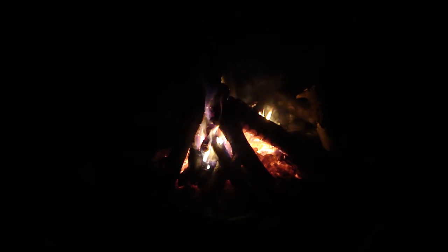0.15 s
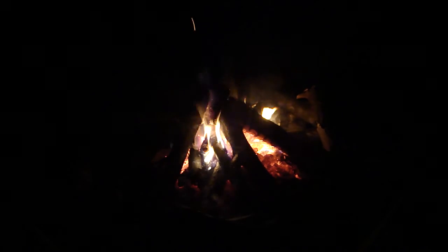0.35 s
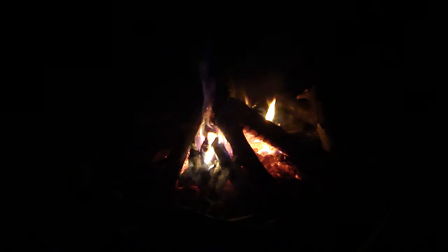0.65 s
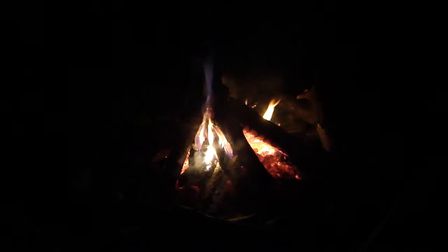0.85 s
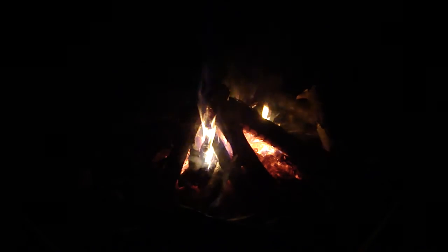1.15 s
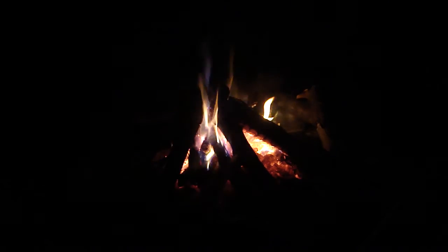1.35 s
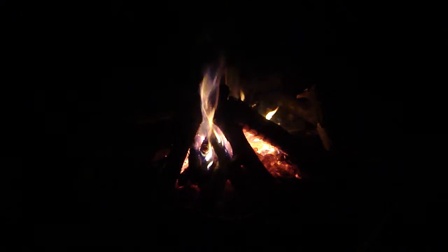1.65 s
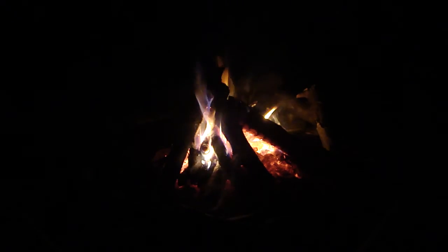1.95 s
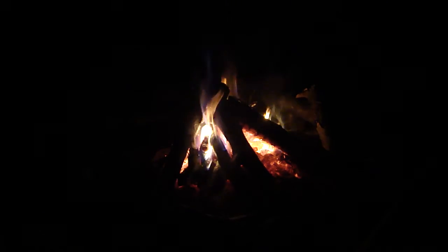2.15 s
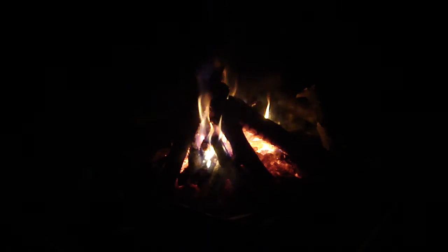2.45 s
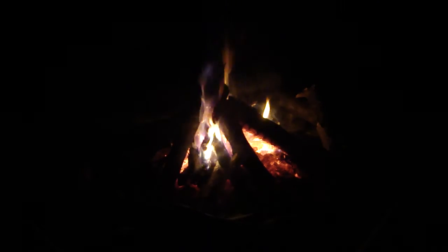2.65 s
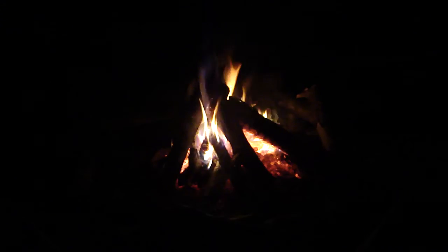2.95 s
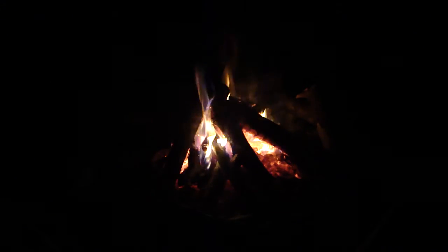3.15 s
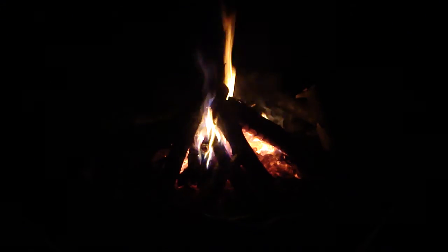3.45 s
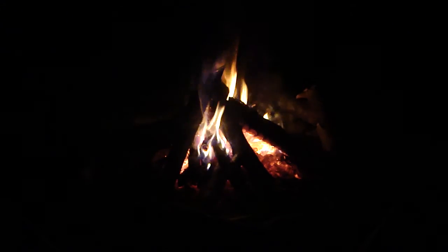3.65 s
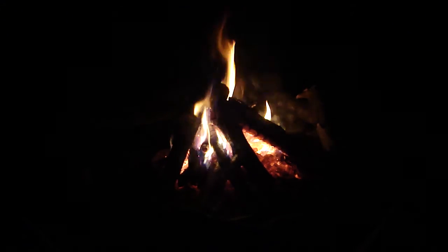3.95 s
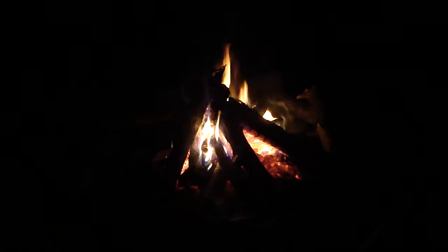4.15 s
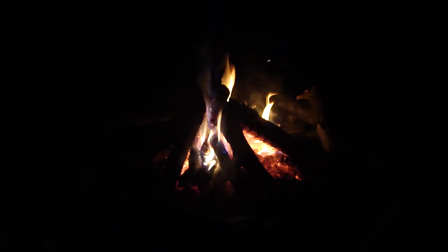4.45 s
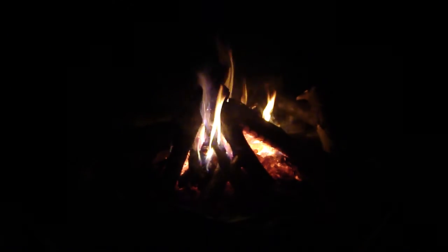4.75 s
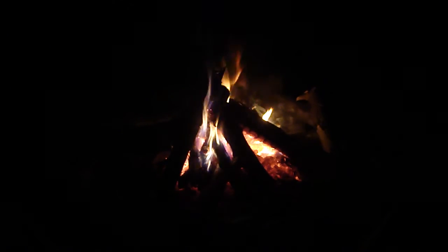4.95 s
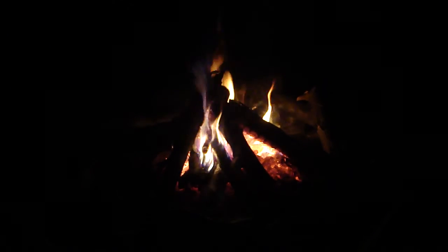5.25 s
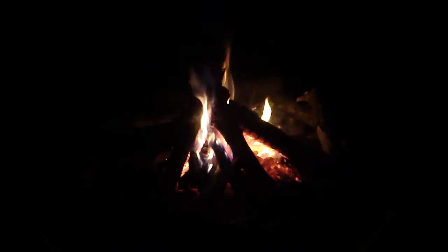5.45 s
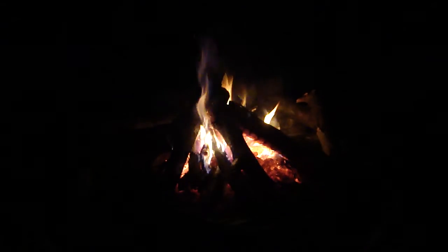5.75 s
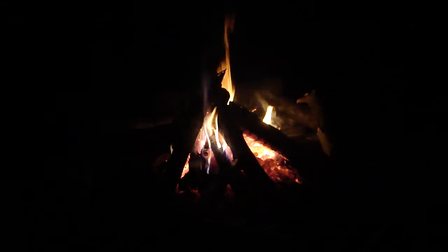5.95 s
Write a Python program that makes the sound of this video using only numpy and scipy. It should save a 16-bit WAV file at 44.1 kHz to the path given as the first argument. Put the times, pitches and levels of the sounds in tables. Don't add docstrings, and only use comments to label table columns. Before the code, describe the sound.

A small campfire at night, heard from a couple of metres. Soft flame roar and thin steady hiss run throughout, with a very faint cricket trill far off. Sharp woody cracks come irregularly, the hardest in the first second and near 2.8 seconds, with fine ticks between. Each pop sprays a brief splintery crackle and gets a quick echo from nearby trees. One microphone, mono.

```python
import sys
import numpy as np
from scipy import signal
from scipy.fft import rfft, irfft, next_fast_len
from scipy.io import wavfile
from scipy.ndimage import uniform_filter1d, map_coordinates

SR = 44100
rng = np.random.default_rng(int(sys.argv[2]) if len(sys.argv) > 2 else 0)


def voltage_ratio(decibels):
    exponent = np.asarray(decibels, float) / 20
    return 10 ** exponent


def to_wav(s):
    ch = np.atleast_2d(s).T
    pcm = np.round(np.clip(ch, -1, 1) * 32767)
    wavfile.write(sys.argv[1], SR, pcm.astype(np.int16))


N = 268524

# freq_hz, level_db (per Hz)
ROAR_COLOUR = [(20, -36.5), (85, -24.5), (112, -16.5), (182, -12.5), (300, -10), (543, -12), (700, -10),
               (1000, -11), (1500, -16.5), (2250, -20.5), (4000, -28.5), (8000, -40)]
# freq_hz, level_db (per Hz)
HISS_COLOUR = [(500, -35), (1500, -15.5), (2800, 3), (4500, 0), (6000, -4.5), (7300, -1), (8500, -3),
               (10900, -3.5), (14000, -12)]
# centre_hz, width_hz
HOLLOW = (342, 87)
# time_s, level_db
DRAUGHT = [(0, -62), (.6, -65.5), (1.9, -60), (3.1, -59.5), (3.34, -52.5), (3.6, -59), (3.9, -55),
           (4.6, -54), (5.1, -54), (6.09, -54)]
# start_s, peak_db, pitch_hz
TICKS = [(0.0494, -54, 3680), (1.5994, -37, 1010), (2.0238, -54, 3390), (2.0946, -47, 3010),
         (2.6792, -34, 7630), (3.023, -41, 4630), (3.3258, -48, 3150), (3.5063, -42, 4540),
         (3.526, -40, 3430), (4.0562, -40, 3210), (4.2333, -41, 4500), (4.6994, -50, 4220),
         (5.8194, -40, 3640), (5.895, -43, 3360)]
BURSTS = {"leaning": [(0.6288, -13.9, 1640, 5.5, -7), (0.7325, -21, 1490, 4, -27),
          (2.1354, -25.5, 3350, 16.5, -13), (2.4888, -45, 3500, 3, -31), (3.9049, -37.5, 1390, -1, -45),
          (3.9295, -27.5, 2980, -4, -21.5)], "front": [(0.1749, -16, 2650, -4, -19),
          (0.9756, -32, 2600, 1.5, -19), (3.6122, -27, 6300, -7.5, -27), (4.0839, -30.5, 6380, -14, -30),
          (4.3566, -25.5, 2950, -12, -24), (5.1339, -32.5, 2120, -3.5, -24)],
          "back": [(0.4848, -46, 3330, -4, -42), (2.2901, -40.3, 900, -9, -33),
          (2.7795, -12, 2170, -22, -10.5), (3.0052, -32.5, 1070, -9, -38), (4.615, -34.5, 6100, -13.2, -48),
          (6.0638, -40, 1700, -4.5, -32)], "side": [(1.1952, -27.5, 920, 9.5, -19),
          (1.3342, -49, 910, 9, -31), (5.2251, -42.5, 915, 9.5, -28), (5.5847, -38, 1300, 11.5, -22)],
          "top": [(2.5953, -47, 2500, -7, -27.5), (5.6959, -23.5, 1430, 5, -14.5)]}
SECOND_JUMP_LAG_MS = {"leaning": .87, "front": .23, "back": 1.32, "side": .84, "top": .76}
LOGS = {"leaning": (3, 8500, 9000, 0), "front": (0.54, 7600, 11000, 1), "back": (0.96, 3600, 9000, 1),
        "side": (4.4, 9900, 4700, 3.3), "top": (4, 4500, 9000, -2.5)}
LOG_MODES = {"leaning": [(1515, -14.5, 0.012), (2460, -31, 0.015), (4500, -14, 0.0058),
             (7600, -15.5, 0.0027), (9270, -12, 0.0025), (10340, -16, 0.0034)], "front": [(586, -14, 0.019),
             (1300, -8.5, 0.0043), (2790, -25, 0.025), (3350, -7.5, 0.005), (4850, -13, 0.0072),
             (9670, -9, 0.0035)], "back": [(670, -17.5, 0.034), (1390, -13.5, .012), (2950, -12.5, 0.015),
             (4400, -23, .008), (7300, -15, .005)], "side": [(725, -5.5, 0.0097), (1640, -13.5, 0.026),
             (3360, -11.5, 0.0092), (4680, -18, 0.0091)], "top": [(705, -16.5, 0.028), (1490, -5, 0.017),
             (2646, -5, 0.0083), (4500, -11.5, 0.01)]}
# freq_hz, t60_s
TREE_DECAY = [(400, 0.059), (2000, 0.22), (6000, 0.14), (11000, 0.14)]
# freq_hz, level_db
LEAF_COLOUR = [(300, -14), (1000, -15), (3000, 1.5), (7000, 10.5), (11000, 6)]
# freq_hz, width_hz, share (0 to 1)
GROUND_DIPS = [(1950, 150, 0.33), (3670, 220, 0.62)]
# down_s, up_s, depth_db, click_db
GAIN_STEPS = [
    (.6295, .6857, -3, -34),
    (2.1362, 2.1705, -6, -33),
]
# freq_hz, level_db
BAND_LIMIT = [(11000, 0), (11090, -29), (12900, -59), (12990, -17), (13150, -19), (13500, -36),
              (13900, -50), (14500, -90)]

ROAR_DB, HISS_DB, CRICKET_DB = -53.5, -60.5, -66.5
SPLINTER_T60_S, SPLINTER_DRIVE_DB = 0.005, -8.5
ECHO_DB_PER_OCTAVE = -0.5


def unit(x):
    return x / np.sqrt(np.mean(x ** 2) + 1e-20)


def along(points, hz):
    f, v = np.transpose(points)
    return np.interp(np.log(hz + 1), np.log(f + 1), v)


def wobble(rate_hz):
    knots = rng.standard_normal(int(N * rate_hz / SR) + 4)
    return map_coordinates(knots, [np.arange(N) * rate_hz / SR])


def filtered(x, response):
    n = x.shape[-1]
    m = next_fast_len(n + 4096)
    return irfft(rfft(x, m) * response(np.fft.rfftfreq(m, 1 / SR)), m)[..., :n]


def resonance(hz, width_hz):
    return lambda f: 1j * f * width_hz / (hz * hz - f * f + 1j * f * width_hz)


def rush(response, patchy_db):
    z = signal.stft(rng.standard_normal(N), nperseg=512)[2]
    patches = uniform_filter1d(rng.standard_normal(z.shape), size=6, axis=0)
    patches = uniform_filter1d(patches, size=10, axis=1)
    noise = signal.istft(z * voltage_ratio(patchy_db * unit(patches)), nperseg=512)[1][:N]
    return unit(filtered(noise, response))


def flames():
    flicker = wobble(11)

    roar_db = ROAR_DB + 0.51 * flicker + 0.35 * wobble(40)
    roar = voltage_ratio(roar_db) * rush(lambda f: voltage_ratio(along(ROAR_COLOUR, f)), patchy_db=0.62)

    draught_s, draught_db = np.transpose(DRAUGHT)
    hollow_db = np.interp(np.arange(N) / SR, draught_s, draught_db) - 2 + flicker + 1.2 * wobble(25)
    hollow = voltage_ratio(hollow_db) * rush(lambda f: resonance(*HOLLOW)(f) ** 2, patchy_db=1.0)

    hiss_db = HISS_DB + 0.32 * flicker
    hiss = voltage_ratio(hiss_db) * rush(lambda f: voltage_ratio(along(HISS_COLOUR, f)), patchy_db=0.5)
    return roar + hollow + hiss


def cricket():
    level_db = CRICKET_DB + 0.7 * wobble(1.5)
    stroke_phase = 2 * np.pi * np.cumsum(33.0 * (1 + 0.012 * wobble(3.43))) / SR
    swell = 0.8 + np.clip(np.sin(stroke_phase), 0, 1)
    pitch_hz = 2420 + 40 * np.cos(stroke_phase) + 30 * wobble(60)
    tone = np.sin(2 * np.pi * np.cumsum(pitch_hz) / SR)
    blur = rush(lambda f: resonance(2430, 190)(f) ** 2, patchy_db=0.0)
    return voltage_ratio(level_db) * unit(swell * (tone + 0.65 * blur))


def ticks(count=120):
    draw = rng.random((count, 3))
    faint_s = draw[:, 0] * N / SR
    faint_db = -56 - 3.5 * np.log(draw[:, 1] + .03)
    faint_hz = 3500 * voltage_ratio(16 * (draw[:, 2] - .5))
    out, t = np.zeros(N + SR), np.arange(300) / SR
    for start_s, peak_db, hz in np.r_[TICKS, np.c_[faint_s, faint_db, faint_hz]]:
        snap = voltage_ratio(peak_db - 60 * t * hz / 9) * np.sin(2 * np.pi * hz * t)
        out[round(start_s * SR):][:len(t)] -= snap
    return out[:N]


def jump(t, hz):
    u = 2 * np.pi * hz * t
    u = np.where(u > 0, u / 1.306, u)
    return u * np.exp(.5 - u * u / 2)


def reach(f, hz):
    return f / hz * np.exp(.5 - (f / hz) ** 2 / 2)


def trees():
    hz, frame_s, z = signal.stft(rng.standard_normal(SR // 5), SR, nperseg=256)
    decay_db = -60 * frame_s / along(TREE_DECAY, hz)[:, None]
    tail = signal.istft(z * voltage_ratio(along(LEAF_COLOUR, hz)[:, None] + decay_db), SR, nperseg=256)[1]
    t = np.arange(len(tail)) / SR
    leaves = np.clip((t - .011) / 0.011, 0, 1) * tail
    trunk = (t > .0238) * voltage_ratio(-60 * np.abs(t - .0238) / 0.0049) * rng.standard_normal(len(t))
    ground = voltage_ratio(-60 * t / 0.03) * rng.standard_normal(len(t))
    layers = ((leaves, -15), (trunk, -22), (ground, -9.5))
    return sum(voltage_ratio(db) * x / np.linalg.norm(x) for x, db in layers)


def pops():
    out, lead = np.zeros(N + SR), 64
    t = (np.arange(1400) - lead) / SR
    after = np.maximum(t, 0)
    for name, bursts in BURSTS.items():
        ratio, spray_hz, width_hz, log_echo_db = LOGS[name]
        second_t = t - SECOND_JUMP_LAG_MS[name] / 1000
        spray = lambda f: resonance(spray_hz, width_hz)(f) ** 2
        for start_s, peak_db, hz, second_db, spray_db in bursts:
            jumps = voltage_ratio(peak_db) * (jump(t, hz) + voltage_ratio(second_db) * jump(second_t, ratio * hz))

            ring = np.zeros(len(t))
            for mode_hz, mode_db, t60_s in LOG_MODES[name]:
                drive = voltage_ratio(peak_db) * (reach(mode_hz, hz) + voltage_ratio(second_db) * reach(mode_hz, ratio * hz))
                drive += voltage_ratio(spray_db + SPLINTER_DRIVE_DB) * abs(spray(mode_hz))
                ring += drive * voltage_ratio(mode_db - 60 * after / t60_s) * np.sin(2 * np.pi * mode_hz * after)

            grit = unit(filtered(rng.standard_normal(len(t)), spray))
            swell = np.clip(t / 0.00029, 0, 1) * voltage_ratio(-60 * after / SPLINTER_T60_S)
            splinters = voltage_ratio(spray_db - 14.5) * swell * grit
            bounce = np.pad(splinters, (47, 0))[:len(t)]

            start = round(start_s * SR) - lead
            out[start:][:len(t)] += jumps + splinters - .85 * bounce + ring
            echo_db = log_echo_db + ECHO_DB_PER_OCTAVE * np.log2(hz / 2000)
            to_trees = jumps + 1.9 * splinters + 0.27 * ring
            echo = voltage_ratio(echo_db) * signal.fftconvolve(to_trees, trees())
            out[start:][:len(echo)] += echo
    for hz, width_hz, share in GROUND_DIPS:
        out = filtered(out, lambda f: 1 - share * resonance(hz, width_hz)(f))
    return signal.sosfilt(signal.butter(2, 170, "high", fs=SR, output="sos"), out[:N])


def scene():
    return (pops() + ticks() + flames() + cricket())[None]


def low_pass(x):
    return signal.sosfilt(signal.butter(12, 13700, fs=SR, output="sos"), x)


def record(dry):
    t = np.arange(N) / SR
    gain_db, clicks = np.zeros(N), np.zeros(N)
    for down_s, up_s, depth_db, click_db in GAIN_STEPS:
        gain_db += depth_db * ((t > down_s + .002) & (t < up_s))
        for click_s, sign in ((down_s, 1), (up_s, -1)):
            u = np.clip((t - click_s) / 0.00014, 0, 50)
            clicks += sign * voltage_ratio(click_db) * u * np.exp(1 - u)
    mix = filtered(dry * voltage_ratio(gain_db) + clicks, lambda f: voltage_ratio(along(BAND_LIMIT, f)))
    return low_pass(mix)


dry = scene()
out = record(dry)
to_wav(out)
```